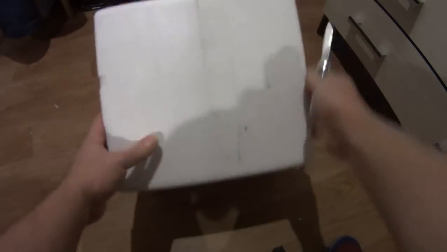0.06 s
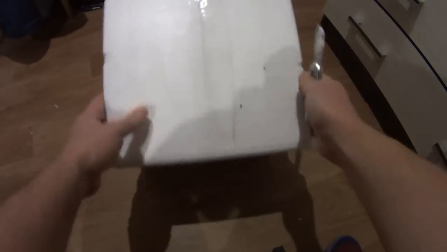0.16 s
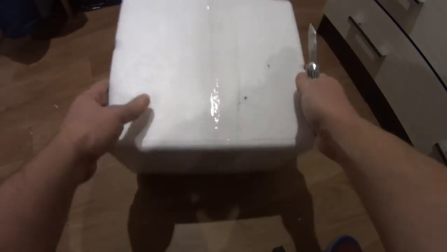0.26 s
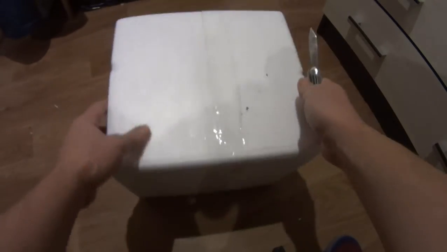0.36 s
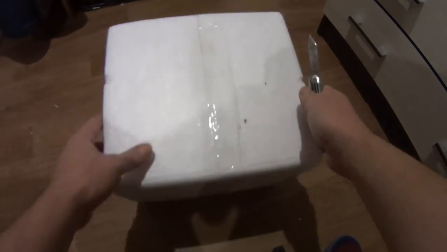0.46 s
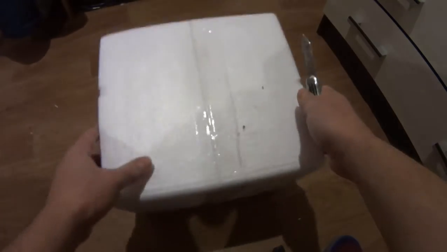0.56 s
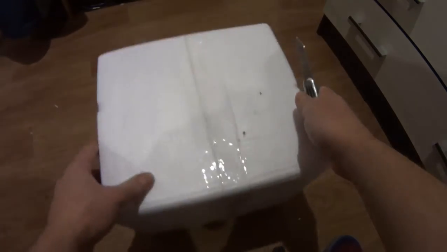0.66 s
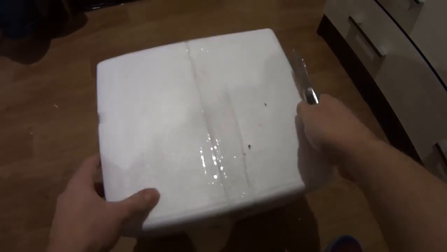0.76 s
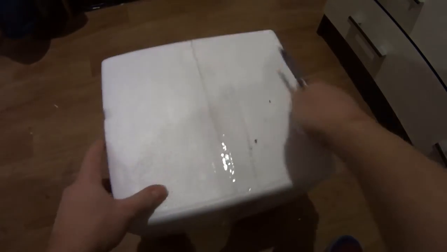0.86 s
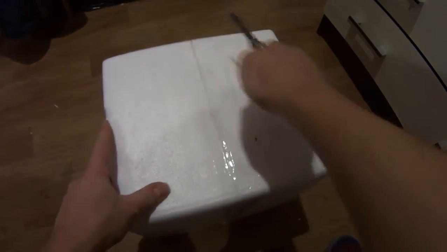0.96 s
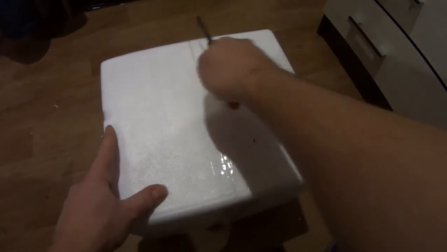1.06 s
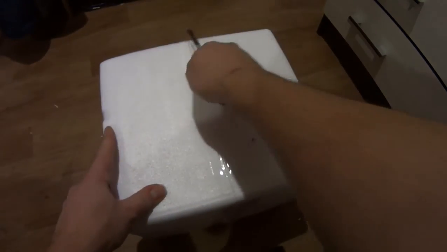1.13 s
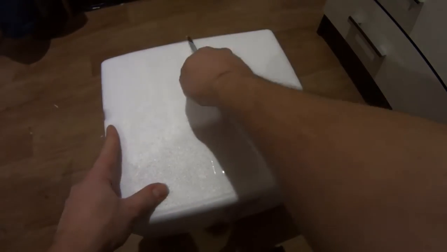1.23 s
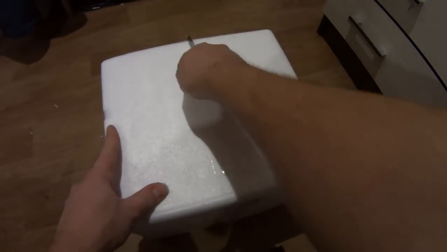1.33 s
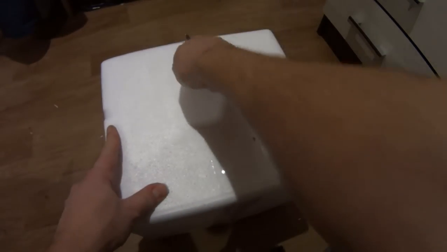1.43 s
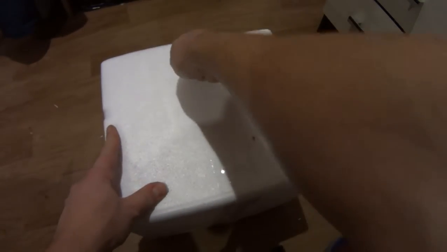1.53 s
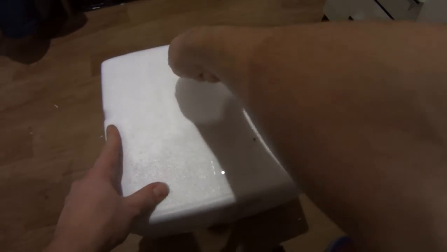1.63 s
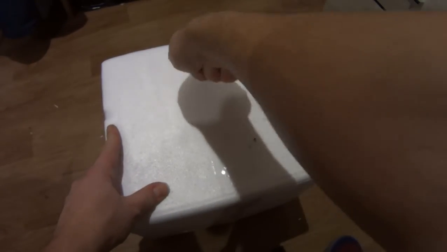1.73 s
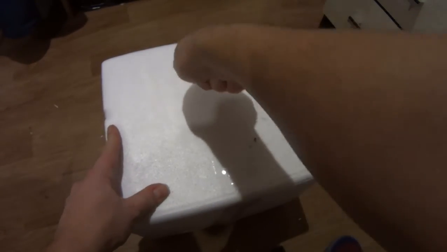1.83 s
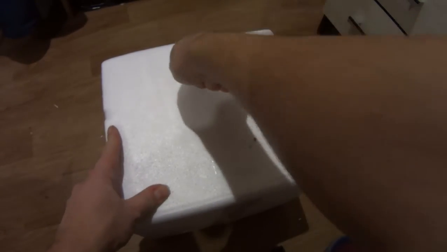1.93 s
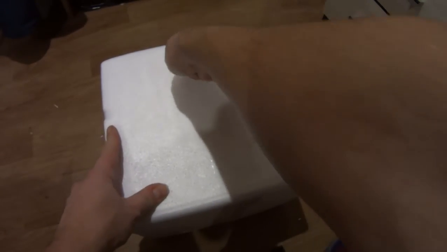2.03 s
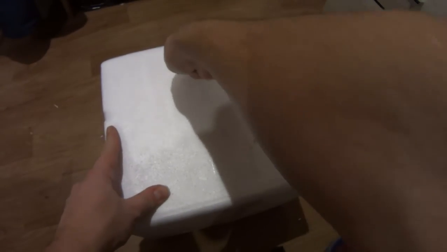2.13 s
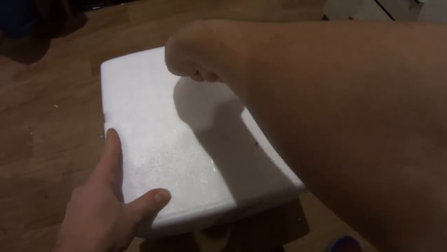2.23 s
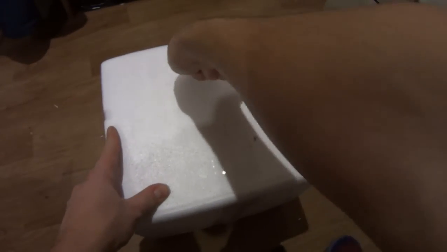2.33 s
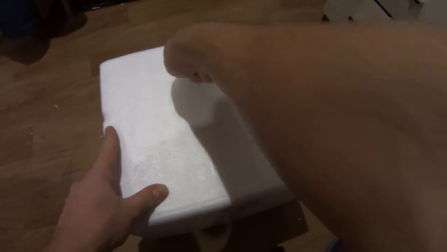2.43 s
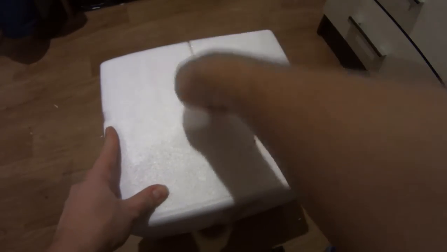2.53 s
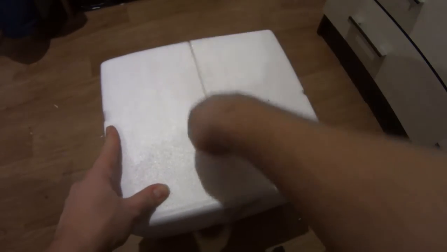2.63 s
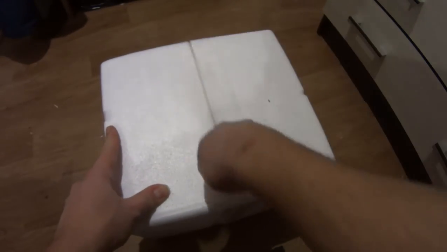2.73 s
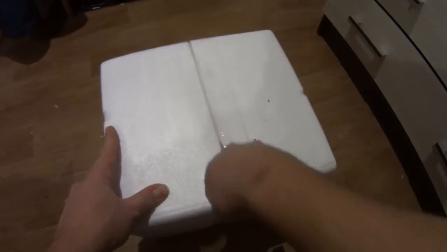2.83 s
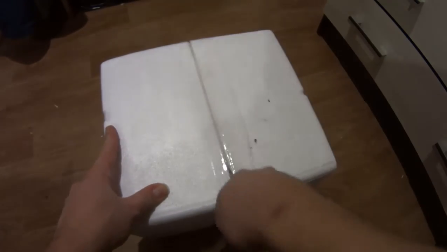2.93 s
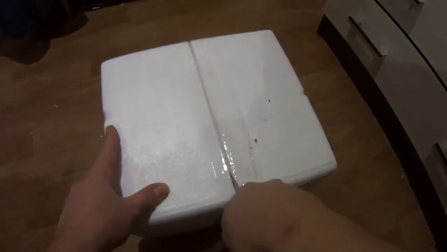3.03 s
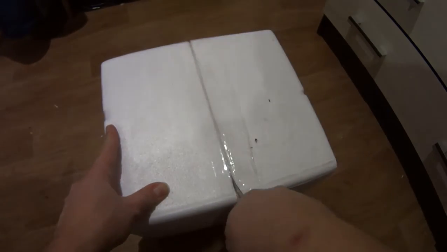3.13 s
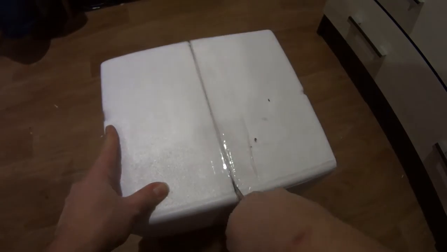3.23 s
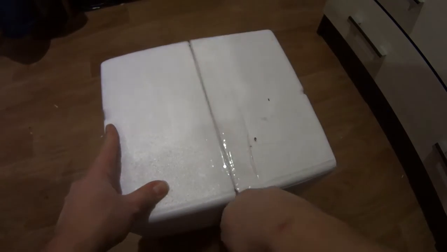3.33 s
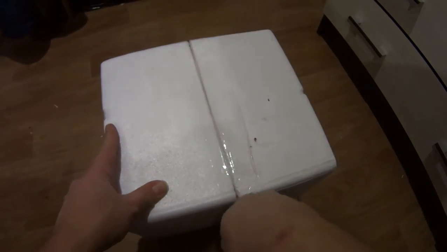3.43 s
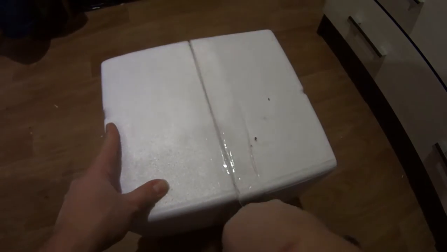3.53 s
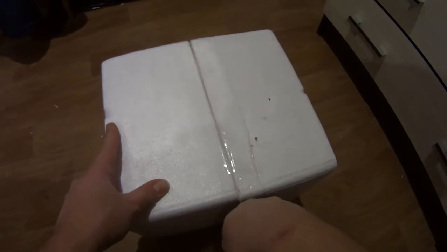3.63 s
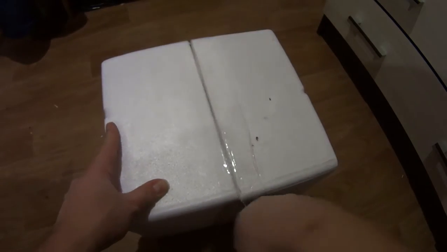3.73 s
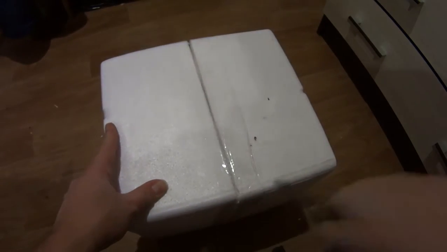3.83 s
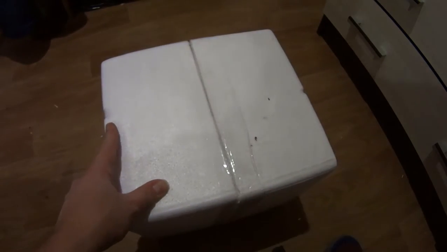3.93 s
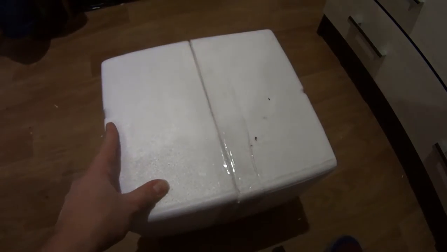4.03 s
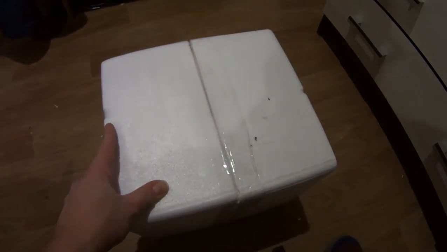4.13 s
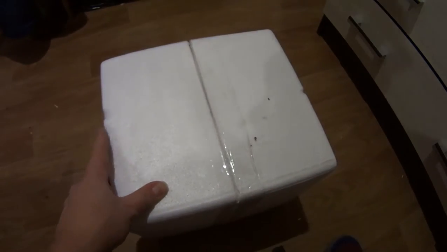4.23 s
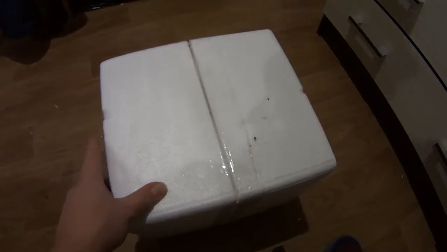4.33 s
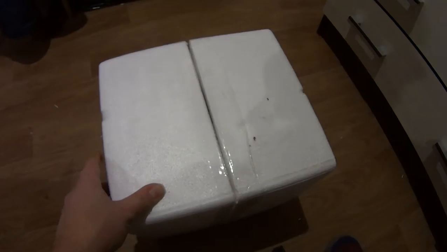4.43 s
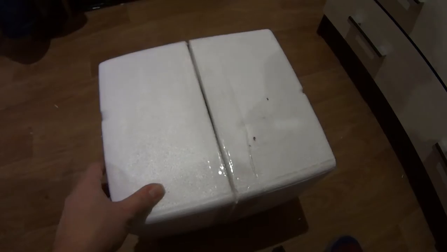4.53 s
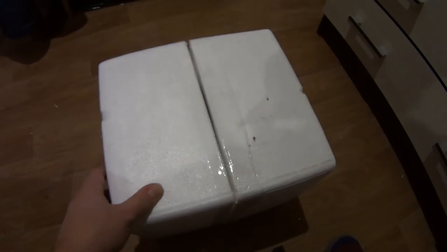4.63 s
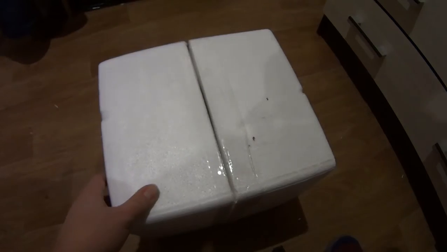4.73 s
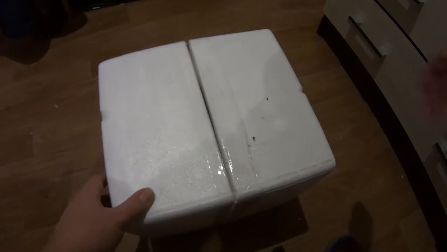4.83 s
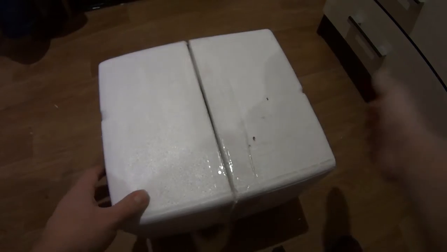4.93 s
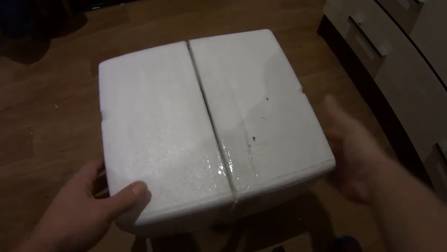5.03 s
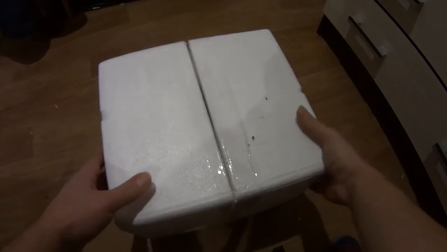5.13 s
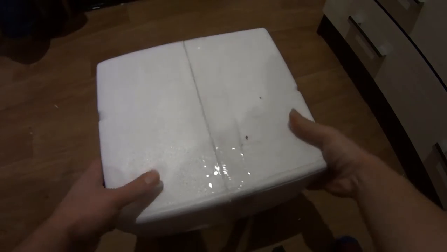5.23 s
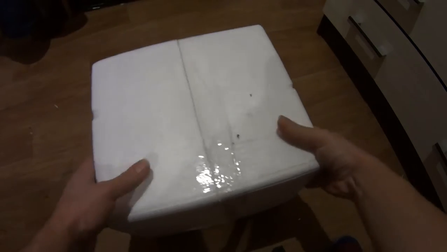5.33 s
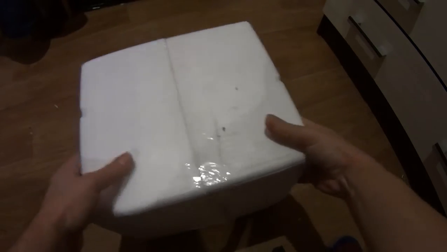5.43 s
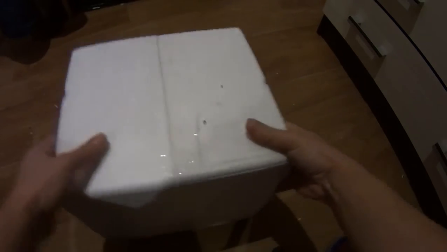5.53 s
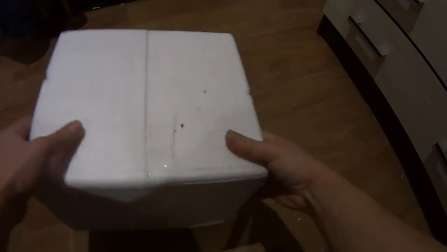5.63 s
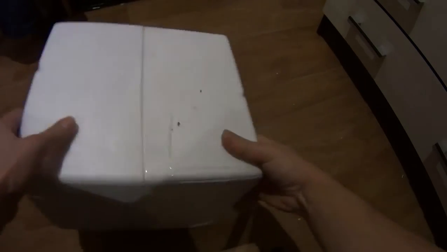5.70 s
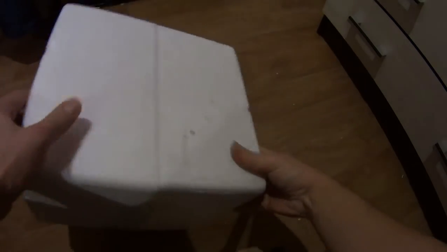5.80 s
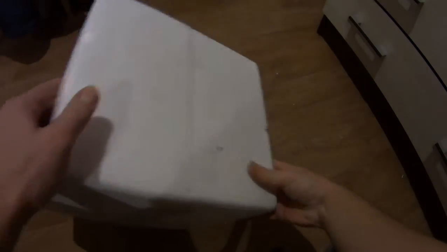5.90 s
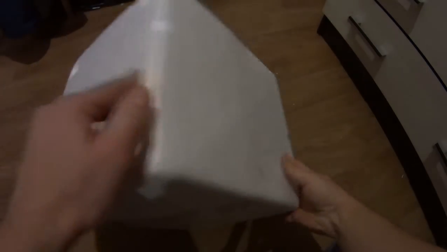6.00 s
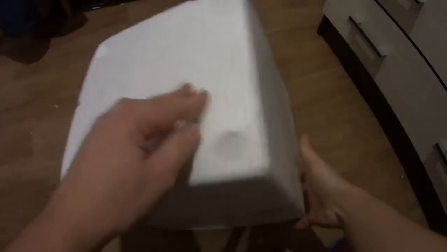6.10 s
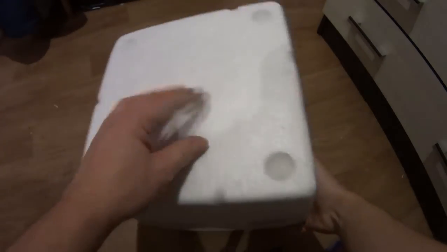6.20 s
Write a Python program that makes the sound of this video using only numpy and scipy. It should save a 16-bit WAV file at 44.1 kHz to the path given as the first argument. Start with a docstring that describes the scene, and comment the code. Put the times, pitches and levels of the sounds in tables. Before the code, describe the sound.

Hands and a knife blade scrape a hollow foam box, with dry hissing rubs, sharp squeaky squeals, snapping tape and soft knocks in a kitchen.

```python
"""Opening a taped polystyrene box

A foam box is shifted on a wooden floor, a knife slits its packing tape, and hands turn it over.
Skin and blade scrape the foam: noise made of countless tiny slips. Contacts that stick and let go squeal.
Snaps are short noise bursts and thumps are ringing box modes, over a dull rumble of the dragged walls.
A small kitchen adds echoes and a quiet background; two microphone ports pick it all up in stereo."""
import sys
import numpy as np
from scipy import signal
from scipy.fft import rfft, irfft
from scipy.io import wavfile
from scipy.ndimage import uniform_filter1d

SR = 44100
rng = np.random.default_rng(int(sys.argv[2]) if len(sys.argv) > 2 else 0)


def master_out(mix):
    """Clip the mix to full scale and print it as 16-bit PCM to the path in sys.argv[1]."""
    frames = np.transpose(np.atleast_2d(mix))
    ceiling = np.clip(frames, -1, 1)
    pcm = np.round(ceiling * 32767).astype(np.int16)
    wavfile.write(sys.argv[1], SR, pcm)


N = 276046  # length in samples
T = np.arange(N) / SR  # time in seconds
F = np.maximum(np.arange(N // 2 + 1) * SR / N, 1)  # frequencies in Hz, kept above 0 for the logarithm


def undb(db):
    """Turn decibels into gain."""
    return 10 ** (np.asarray(db) / 20)


def unit(x):
    """Scale to rms 1."""
    return x / np.sqrt(np.mean(x ** 2))


def colour(points, f=F):
    """Read a gain curve from (Hz, dB) points on a log-frequency axis."""
    hz, db = np.transpose(points)
    return undb(np.interp(np.log(f), np.log(hz), db))


def shape(x, gain):
    """Filter by a gain for each frequency."""
    return irfft(rfft(x) * gain, N)


def walk(rate, size=N):
    """Wander randomly with spread 1, taking a new direction `rate` times a second."""
    steps = rng.standard_normal(size)
    return unit(np.interp(np.arange(size) * rate / SR, np.arange(size), steps))


def add(out, s, x):
    """Mix a short sound in at s seconds."""
    i = max(int(s * SR), 0)
    out[i:i + len(x)] += x[:max(N - i, 0)]


# Strokes of hand, floor or blade on the foam: the box is pushed into place (to 1.2 s), the knife finds
# the seam (to 2.4 s), cuts and saws (to 3.9 s), the holding hand shifts (to 5.1 s), both hands turn the box.
# Each row: start, length, attack and release in seconds, level in dB, low rasp and fine hiss in dB
# relative to that level, wall rumble in dB. All levels are before the trims in scrape() and flexing().
STROKES = [(-0.056, 0.23, 0.1, 0.033, -37, -13, 6.0, -54), (0.114, 0.15, 0.039, 0.16, -34, -14.5, 4, -57),
           (0.204, 0.046, 0.0084, 0.0091, -24.5, -11, -5, -43.5),
           (0.271, 0.13, 0.043, 0.021, -32, -13.5, 4, -50),
           (0.369, 0.044, 0.021, 0.025, -23.5, -12, -17, -41),
           (0.416, 0.025, 0.012, 0.023, -27.5, -6, -7, -34),
           (0.476, 0.035, 0.0093, 0.012, -34, -10.1, 3.5, -35),
           (0.526, 0.093, 0.062, 0.032, -35.5, -10, -3, -61),
           (0.632, 0.065, 0.019, 0.029, -29, -17.5, -5.5, -56.5),
           (0.691, 0.048, 0.036, 0.044, -36, -11, 0.9, -51.5),
           (0.829, 0.057, 0.093, 0.021, -30.5, -15, 9.5, -57),
           (0.903, 0.037, 0.019, 0.045, -42.5, -11.5, 4.5, -59),
           (1.009, 0.13, 0.016, 0.039, -51.5, -13.1, 4, -64),
           (1.156, 0.11, 0.18, 0.16, -52, -9.5, 2.2, -61.5),
           (1.378, 0.14, 0.15, 0.1, -48.5, -9.5, 0, -61.5),
           (1.67, 0.02, 0.0044, 0.032, -47.5, -10.5, 1, -65),
           (1.705, 0.11, 0.073, 0.024, -39, -12, -3, -64), (1.854, 0.2, 0.25, 0.037, -38, -7, -2, -55),
           (2.135, 0.12, 0.17, 0.056, -42, -7, 1.5, -43.5),
           (2.342, 0.022, 0.0076, 0.02, -30, -9, -0.5, -43),
           (2.384, 0.023, 0.0032, 0.028, -39, -6, -0.5, -41.5),
           (2.441, 0.066, 0.062, 0.024, -50, -11, 2.5, -51),
           (2.5, 0.056, 0.016, 0.063, -30, -7.5, 4.5, -46.5),
           (2.547, 0.12, 0.1, 0.033, -30, -15.5, 3, -49.5),
           (2.662, 0.19, 0.06, 0.039, -37.5, -15.8, 10, -55.5),
           (2.869, 0.23, 0.051, 0.016, -34, -16, 6, -63),
           (3.103, 0.044, 0.017, 0.073, -43.5, -11, -16, -55.5),
           (3.165, 0.024, 0.018, 0.0067, -35, -32, 5.5, -58),
           (3.283, 0.089, 0.015, 0.011, -37.5, -15.5, 12, -65.5),
           (3.376, 0.023, 0.008, 0.032, -42.5, -20, 3.5, -51.5),
           (3.472, 0.058, 0.021, 0.015, -33.5, -16, 4, -51),
           (3.603, 0.07, 0.029, 0.0094, -24.5, -30, 4, -58.5),
           (3.736, 0.059, 0.011, 0.01, -41.5, -17.1, 8, -61),
           (3.766, 0.062, 0.034, 0.0077, -35.5, -18, 1, -60.5),
           (3.848, 0.16, 0.017, 0.048, -70.5, -9.7, 3.5, -75.7),
           (4.221, 0.059, 0.009, 0.038, -65.5, -24, 7.1, -85.3),
           (4.32, 0.13, 0.14, 0.055, -61, -20, 3.5, -79.5),
           (4.573, 0.046, 0.035, 0.035, -57.5, -22, 6, -76),
           (4.62, 0.187, 0.041, 0.12, -58.5, -18.5, 3, -70),
           (4.788, 0.12, 0.06, 0.032, -56.5, -4, 0.5, -67),
           (4.976, 0.15, 0.075, 0.039, -68.5, -10, -1, -70.8),
           (5.106, 0.058, 0.019, 0.017, -45.5, -13.5, 4.5, -54.5),
           (5.154, 0.13, 0.03, 0.027, -43.5, -18.5, 6, -62.5),
           (5.287, 0.098, 0.019, 0.025, -38, -11.5, 1.5, -58),
           (5.391, 0.2, 0.015, 0.015, -32, -10.5, 0.5, -51),
           (5.567, 0.071, 0.052, 0.073, -27, -15.4, 5, -52), (5.653, 0.15, 0.024, 0.17, -35, -19.5, 8, -66),
           (5.814, 0.054, 0.011, 0.0084, -29, -17.0, 1, -77),
           (5.852, 0.1, 0.12, 0.029, -31.5, -11.5, 2, -55.5),
           (5.992, 0.095, 0.039, 0.018, -37.6, -12.5, 6, -58.2),
           (6.065, 0.11, 0.023, 0.037, -31, -18, 7.5, -62.5),
           (6.154, 0.092, 0.056, 0.028, -23.5, -16, 0.9, -59)]


def strokes(swell_power=2.06, air_follow=0.84):
    """Every stroke swells, holds and dies away; returns the strength of rasp, middle, hiss, air and rumble."""
    t, power = T[::40], 0  # a coarse time grid is enough for slow swells
    for start, length, attack, release, db, rasp, hiss, rumble in STROKES:
        rise = np.clip((t - start) / max(attack, .002), 0, 1)
        swell = np.sin(np.pi / 2 * rise) ** swell_power  # a higher power sets in more softly
        fade = np.exp(-np.maximum(t - start - length, 0) / release)
        air = hiss * (1 + air_follow)  # the topmost band exaggerates the hiss
        bands = undb([db + rasp, db, db + hiss, db + air, rumble])
        power = power + np.outer(bands, swell * fade) ** 2
    return [np.interp(T, t, np.sqrt(p)) for p in power]


# What the foam walls radiate best.
# Each row: centre in Hz, width in Hz, boost in dB.
RESONANCES = [(2227, 360, 3), (1390, 160, 0), (3380, 740, 2.5), (4950, 760, 6.5), (10585, 330, 10.5)]


def panels():
    """Foam walls have broad, well damped resonances that boost nearby frequencies."""
    return undb(sum(db / (1 + (2 * (F - hz) / width) ** 2) for hz, width, db in RESONANCES))


# Tone colour of the foam, shared by scrapes and snaps.
# Each row: frequency in Hz, relative level per Hz in dB.
FOAM_COLOUR = [(180, -46.5), (330, -24.5), (450, -29.5), (760, -22.5), (1240, -7.5), (1750, -7), (2200, 1),
               (3950, -6.5), (4970, 0.5), (7390, -3.5), (8220, -9.5), (10500, -7.5), (11000, -11),
               (11500, -39.5), (15000, -61), (22000, -120)]


def scrape(rasp, middle, hiss, air, spread_db=0.5, patchy_db=1.66, chatter_db=-0.02,
           rasp_db=1.13, middle_db=0.3, hiss_db=-1.5, air_db=-10.5):
    """Dense micro-slips over the foam beads, bunched by the unsteady hand, sound as four bands of noise."""
    slips = rng.standard_normal(N) * (rng.random(N) < .3)  # three samples in ten hold a slip
    slips = slips * undb(spread_db * rng.standard_normal(N))
    slips = slips * undb(patchy_db * walk(70) + chatter_db * walk(520))
    foam = rfft(slips) * colour(FOAM_COLOUR) * panels()
    # lowest and highest Hz, strength over time, trim in dB
    zones = [(250, 1700, rasp, rasp_db), (1700, 4200, middle, middle_db),
             (4200, 7500, hiss, hiss_db), (7500, 12000, air, air_db)]
    total = 0
    for lo, hi, strength, db in zones:
        band = irfft(foam * ((F >= lo) & (F < hi)), N)
        total = total + unit(band) * strength * undb(db)
    return total


def stick_slip(hz, rough, jitter=0.14, stray=0.13, flutter_db=2.5, overtone_db=-1.5,
               half_rate=0.14, knee_hz=5500):
    """One contact sticks and lets go thousands of times a second; the rougher, the more its rate strays."""
    wobble, flutter, drift = (walk(rate, size=SR // 2)[:len(hz)] for rate in (2200, 450, 160))
    wandering_hz = hz * (1 + rough * (jitter * wobble + stray * drift))
    phase = 2 * np.pi * np.cumsum(wandering_hz) / SR
    # overtones are strong when slips are slow and weak when they are fast
    wave = np.sin(phase)
    for k in range(2, 7):
        gain = undb(overtone_db) / np.hypot(1, k * hz / knee_hz)
        wave = wave + gain * (k * hz < SR / 3) * np.sin(k * phase)
    # rough contact alternates strong and weak slips
    wave = wave * (1 + half_rate * rough * np.sin(phase / 2))
    return unit(wave * undb(flutter_db * rough * flutter))


# Stick-slip squeals, each one bent glide.
# Each row: start and length in seconds, level in dB before the level_db trim and the panel boost,
# central slip rate in Hz at start, middle and end, roughness (0 is smooth, about 1 very rough).
SQUEAL_GLIDES = [ (0.601, 0.041, -39.5, 2550, 3700, 6300, .1), (0.64, 0.0502, -33, 2192, 2350, 2000, .3),
                 (2.534, 0.038, -25.5, 8500, 9900, 9200, 0.5), (2.584, 0.024, -23.5, 8800, 9500, 8400, .35),
                 (2.663, 0.051, -28, 10600, 9000, 7800, 0.65),
                 (2.723, 0.042, -17.5, 8000, 7550, 8300, 0.36), (2.761, 0.046, -19, 5900, 5970, 7100, 0.63),
                 (2.822, 0.057, -19.5, 5000, 9500, 12400, .35),
                 (2.901, 0.041, -26, 7500, 10400, 7700, 0.38),
                 (2.944, 0.051, -18.5, 6800, 4900, 6900, 0.53), (2.986, 0.045, -21, 3100, 3700, 2900, 0.4),
                 (3.024, .043, -21, 4500, 4300, 2800, 0.5), (3.067, 0.026, -24, 5300, 7700, 3300, 0.47),
                 (3.184, 0.02, -33, 4500, 2950, 2500, 0.29), (3.296, .031, -22.5, 2993, 3830, 3800, 0.4),
                 (3.321, 0.032, -19.5, 6800, 6700, 3800, 0.77), (3.355, .028, -19, 8500, 6900, 2400, 0.8),
                 (3.489, 0.009, -24, 2600, 2160, 2230, 0.48), (3.501, 0.012, -29, 5800, 11000, 11000, 0.6),
                 (3.522, .022, -29.5, 5280, 6300, 5100, 0.48), (3.616, 0.032, -28, 1887, 1900, 2100, .2),
                 (3.645, 0.031, -23.5, 2883, 2750, 1740, 0.2), (5.578, 0.22, -28, 5400, 6200, 5700, 0.69),
                 (5.765, 0.09, -23, 6000, 7400, 8100, 1.11)]


def squeals(level_db=-2.0, second_db=1.0, edge_s=0.001):
    """Two contacts, like the faces of the blade, squeal along each glide; returns sound and grip."""
    out, grip = np.zeros(N), np.zeros(N)
    for start, length, db, *glide_hz, rough in SQUEAL_GLIDES:
        t = np.arange(0, length, 1 / SR)
        hz = np.interp(t, [0, length / 2, length], glide_hz)
        wave = stick_slip(hz, rough) + undb(second_db) * stick_slip(hz, rough)
        gate = np.clip(np.minimum(t, length - t) / edge_s, 0, 1)
        add(out, start, unit(wave) * undb(db + level_db) * gate)
        add(grip, start, gate * (1 - .5 * rough))
    return shape(out, panels()), uniform_filter1d(grip, SR // 200)  # grip smoothed over 5 ms


# Tape and foam beads snapping free.
# Each row: time in seconds, burst peak in dB before the level_db trim and the foam colour,
# treble in dB relative to the middle.
SNAP_TIMES = [(.147, -18, 12), (0.179, -1, -12), (.209, 2.5, -29), (0.385, 0, -14), (.404, 0.5, -17),
              (1.152, -34, -12), (1.22, -23.5, -24), (1.657, -30.5, 7), (1.678, -16, -2.5),
              (1.886, -26, -8), (2.099, -18.5, -12), (2.237, -11, -12), (2.261, -20, -12),
              (2.347, -19.5, -2), (2.357, -5.5, -5), (2.383, -2.5, -4.5), (2.51, -1.5, -8),
              (3.126, -14, 6.5), (3.173, -26.5, 7), (3.268, -31.5, -2), (3.296, -13.5, 16), (3.487, -5, -3),
              (3.749, -24, 7), (4.227, -47, 12), (4.289, -40, -1), (4.297, -33.5, 1.5), (4.479, -26, -2),
              (4.61, -39.5, 10), (4.732, -34, 6.5), (5.123, -18.5, -3), (5.31, -10, -6), (5.324, -7, -4),
              (5.413, -13, 4), (5.431, -3, -8), (5.487, 1.5, -26), (5.942, -3, -20)]


def snaps(level_db=-4.5, split_hz=4200, t60_s=0.021):
    """Each snap is a burst of tiny fractures, noise that falls by 60 dB in t60_s."""
    middle, treble, t = np.zeros(N), np.zeros(N), T[:SR // 8]
    for s, db, treble_db in SNAP_TIMES:
        burst = rng.standard_normal(len(t)) * undb(-60 * t / t60_s)
        burst *= undb(db + level_db) / np.abs(burst).max()
        add(middle, s, burst)
        add(treble, s, burst * undb(treble_db))
    low = 1 / (1 + (F / split_hz) ** 4)
    body = 1.73 * colour(FOAM_COLOUR) * panels()
    return shape(middle, body * low) + shape(treble, body * (1 - low))


# Knocks of the box on floor and hands.
# Each row: time in seconds, peak in dB before the level_db trim, corner of the blow in Hz.
KNOCKS = [(0.423, -33, 70), (0.436, -28.5, 450), (0.471, -21, 520), (.765, -47, 70), (1.219, -53.5, 900),
          (1.282, -53.5, 100), (2.241, -36.5, 101), (2.264, -49.5, 90), (2.363, -33.5, 100.3),
          (2.395, -27, 100.2), (5.119, -43, 262), (5.43, -49, 100), (5.585, -34, 100)]
# Ways in which box and floor ring together.
# Each row: frequency in Hz, level in dB, time to fall by 60 dB in seconds.
BOX_MODES = [(75.4, -3, 0.29), (118.4, -3.5, 0.2), (167.4, -8, 0.41), (240, -4.5, 0.15), (331, -10.5, 0.22),
             (431, -15.5, 0.27), (485, -10.5, 0.17), (642, -6.5, 0.15)]


def thumps(level_db=0.5, dead_share=0.83, dead_t60=0.064):
    """Blows ring the hollow box; a soft one, with a low corner, reaches only its lowest modes."""
    out, t = np.zeros(N), T[:SR // 2]
    for s, db, corner_hz in KNOCKS:
        ring = 0
        for k, (hz, mode_db, t60) in enumerate(BOX_MODES):
            strength = undb(mode_db) / np.hypot(1, (hz / corner_hz) ** 3)
            # part of each mode, more of the high ones, is smothered by the contact
            dead = dead_share * hz / 100 * undb(-60 * t / dead_t60)
            decay = undb(-60 * t / t60) + dead
            ring = ring + strength * np.sin(2 * np.pi * hz * t) * (-1) ** k * decay
        add(out, s, ring * undb(db + level_db) / np.abs(ring).max())
    return out


# Tone colour of the rumbling walls.
# Each row: frequency in Hz, relative level per Hz in dB.
WALL_COLOUR = [(13, -43), (22, -8.5), (50, -1.5), (81, 0), (127, -5.5), (162, -15), (200, -15), (320, -18),
               (400, -23), (532, -28), (700, -24.5), (910, -44.5), (1540, -120)]


def flexing(rumble, level_db=0.5, uneven_db=3.5):
    """The dragged walls rumble under the hands as low, uneven noise."""
    noise = rng.standard_normal(N) * undb(uneven_db * walk(30))
    return unit(shape(noise, colour(WALL_COLOUR))) * rumble * undb(level_db)


def kitchen(x, near_db=-7.5, near_t60=0.028, scatter_hz=2800, room_db=-11.5, room_t60=0.19):
    """Box edges and hands scatter the treble to both ports alike; the room's short tail is diffuse."""
    t = T[:SR // 2]
    near = rng.standard_normal(len(t)) * undb(-60 * t / near_t60) * (t > .0005)
    highpass = signal.butter(2, scatter_hz, "high", fs=SR, output="sos")
    near = signal.sosfilt(highpass, near)
    tail = rng.standard_normal((2, len(t))) * undb(-60 * t / room_t60) * (t > .006)
    near_echo = undb(near_db) * near / np.linalg.norm(near)
    room_echo = undb(room_db) * tail / np.linalg.norm(tail[0])
    echo = near_echo + room_echo
    wet = signal.fftconvolve(x[None], echo, axes=1)[:, :N]
    return (x + wet) / np.sqrt(1 + np.sum(echo[0] ** 2))  # make up for the added energy


# Tone colour of the quiet background.
# Each row: frequency in Hz, relative level per Hz in dB.
QUIET_COLOUR = [(15, -32.5), (25, -2.5), (221, -9), (330, -10), (529, -12), (720, -12.5), (1000, -12),
                (5190, -10.5), (10600, -14), (11500, -26.5), (15000, -61), (22000, -120)]


def background(level_db=-67.0):
    """A steady, faint noise lies under everything, the same in both ports."""
    return unit(shape(rng.standard_normal(N), colour(QUIET_COLOUR))) * undb(level_db)


def scene(grip_db=-3.5):
    """All the handling sounds in the room; a squealing contact scrapes less."""
    squeal, grip = squeals()
    rasp, middle, hiss, air, rumble = strokes()
    scraping = scrape(rasp, middle, hiss, air) * undb(grip_db * grip)
    handling = scraping + squeal + snaps() + thumps() + flexing(rumble)
    return kitchen(handling) + background()


# Difference between the two microphone ports.
# Each row: frequency in Hz, side relative to mid in dB before the ports_db trim.
PORT_SIDES = [(60, -21), (110, -12), (190, -4.5), (350, 1), (620, 4.5), (1120, -2.5), (2010, 1.5),
              (3610, -8), (6480, -9), (11600, -5.5)]
# Loudness balance of the ports.
# Each row: frequency in Hz, left minus right in dB.
PORT_BALANCE = [(60, -2), (110, 0.5), (190, 0.5), (350, -0.5), (620, -1), (1120, -1), (2010, 1.5),
                (3610, 0.5), (6480, -1.5), (11600, -1.0)]


def record(dry, ports_db=-2.0, top_hz=11200):
    """The left port leads the right in phase, each has its own colour, and the top is cut steeply."""
    sides = np.array([[1], [-1]])  # left, right
    lead = 1 + 1j * colour(PORT_SIDES) * undb(ports_db) * sides
    ports = lead * colour(PORT_BALANCE) ** (sides / 2)
    lowpass = signal.ellip(10, .2, 70, top_hz, fs=SR, output="sos")
    return signal.sosfilt(lowpass, shape(dry, ports))


dry = scene()
out = record(dry)
master_out(out)
```